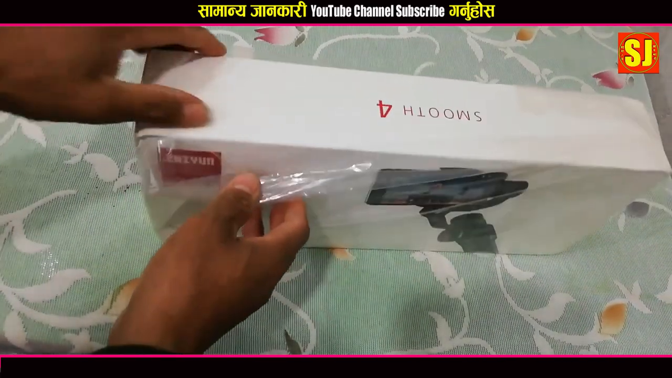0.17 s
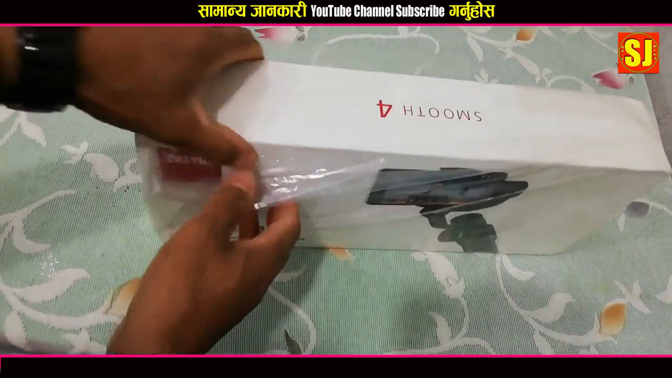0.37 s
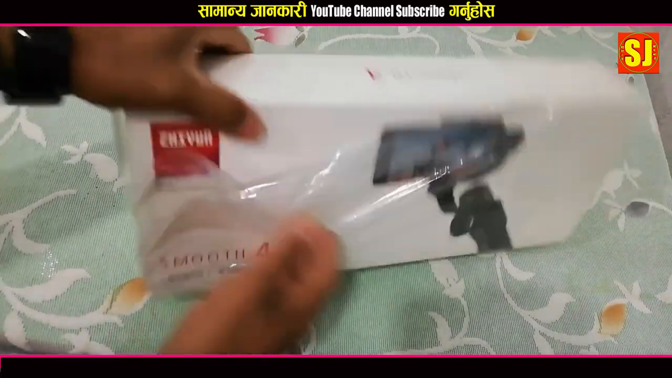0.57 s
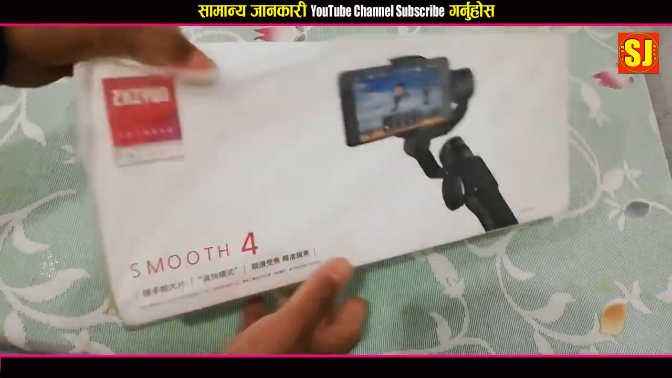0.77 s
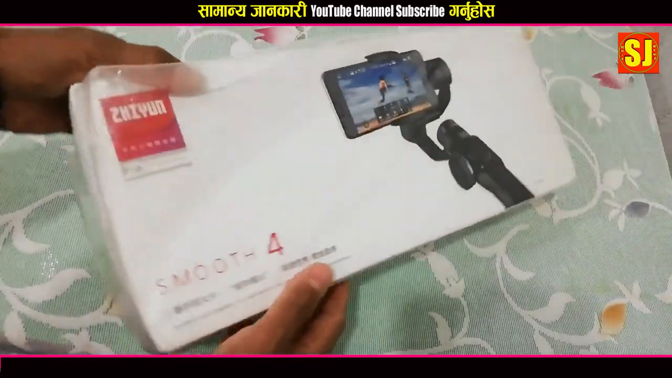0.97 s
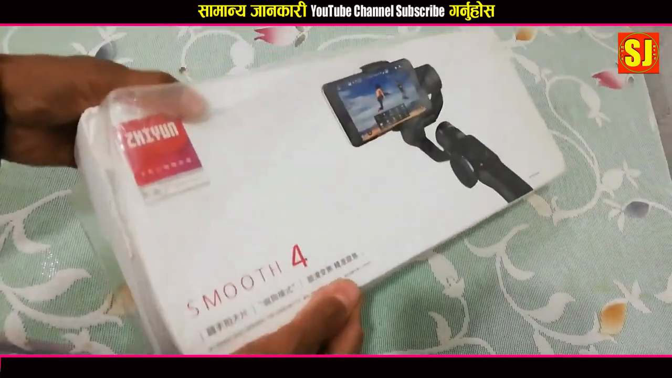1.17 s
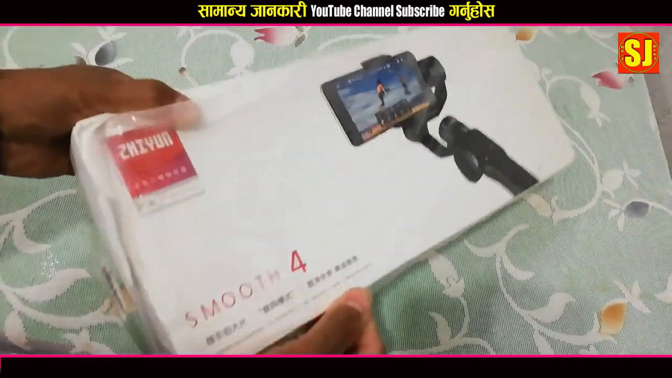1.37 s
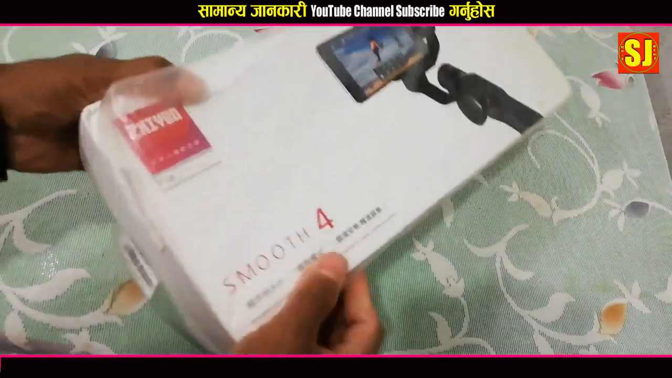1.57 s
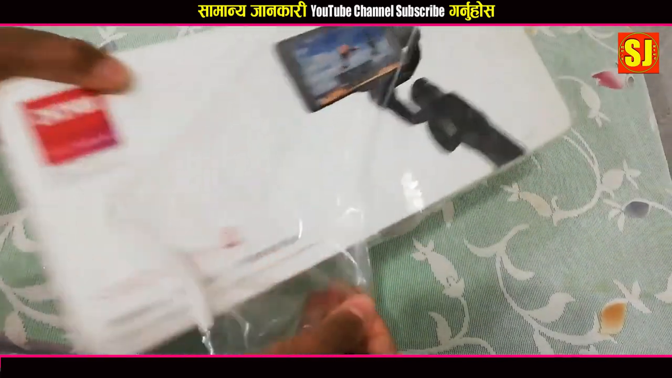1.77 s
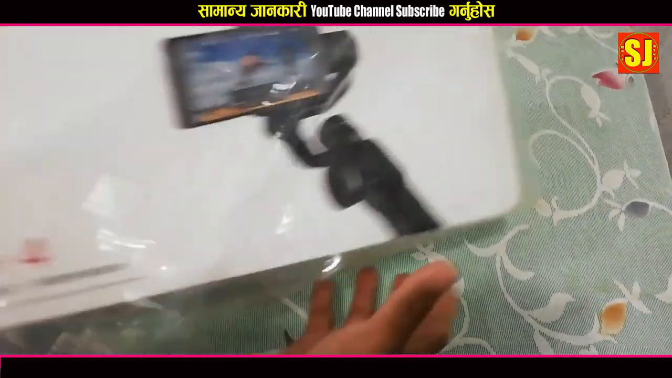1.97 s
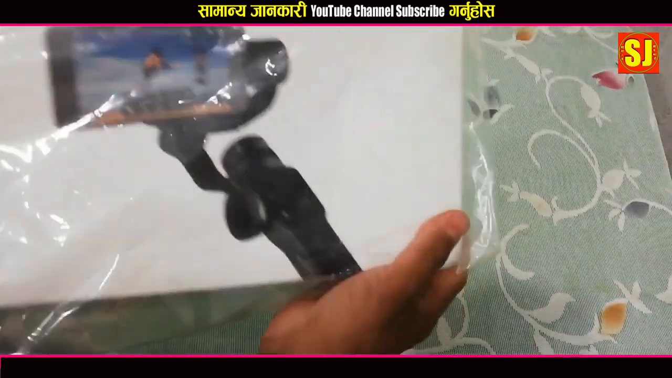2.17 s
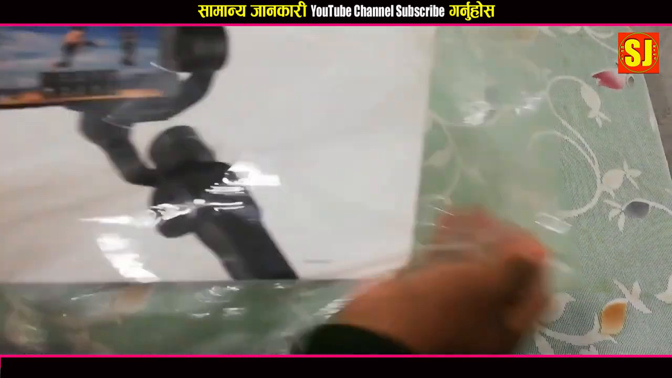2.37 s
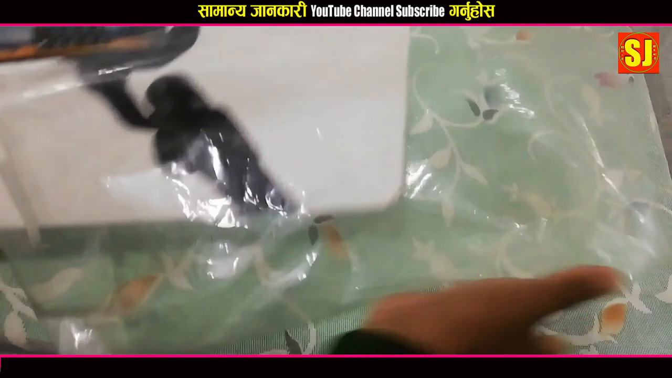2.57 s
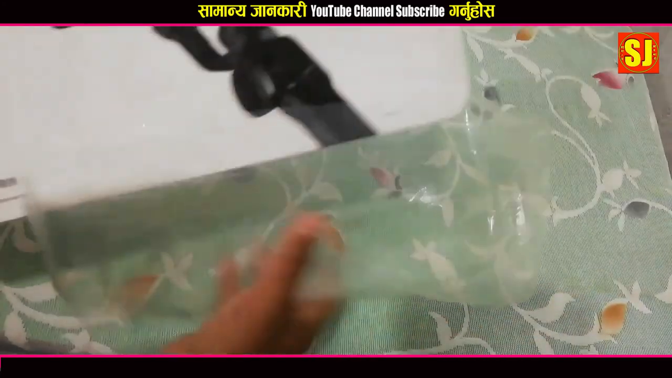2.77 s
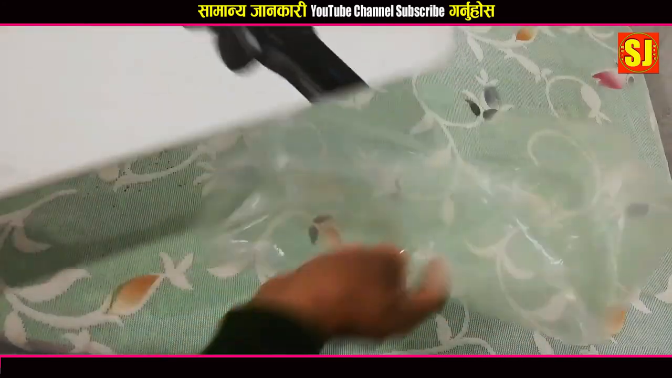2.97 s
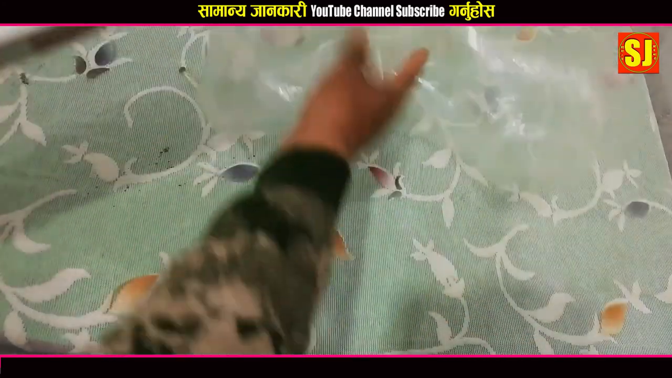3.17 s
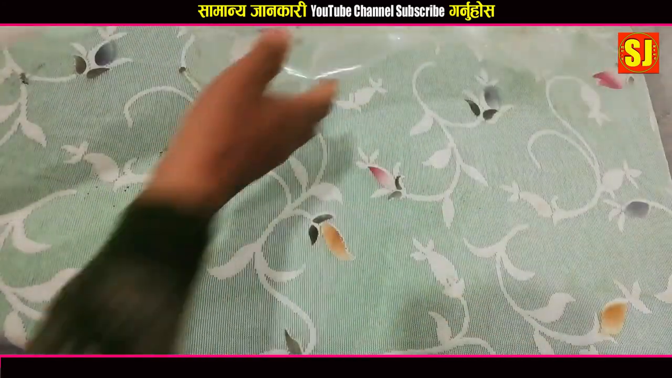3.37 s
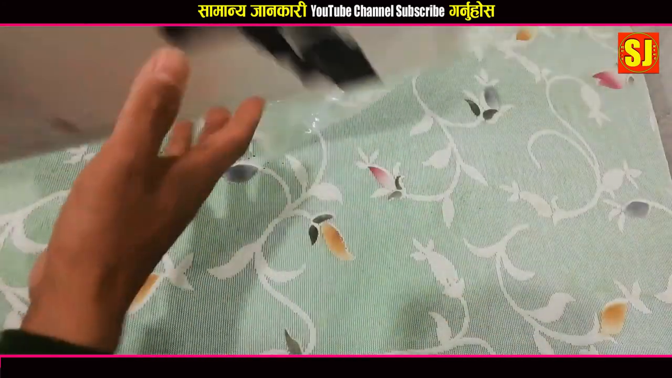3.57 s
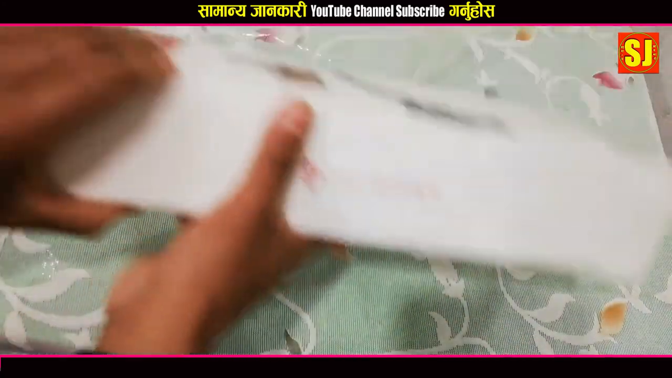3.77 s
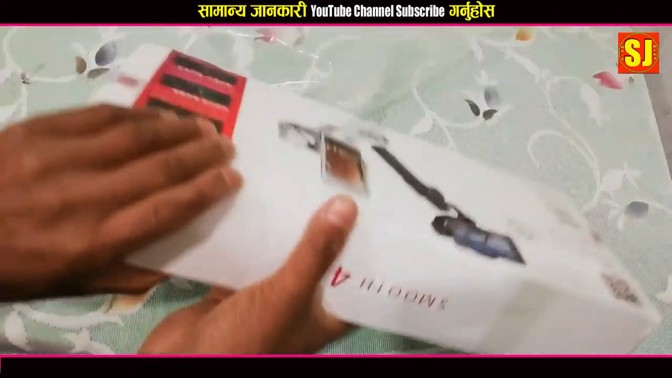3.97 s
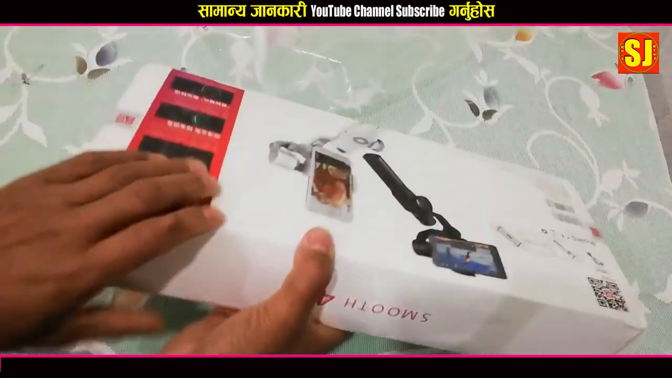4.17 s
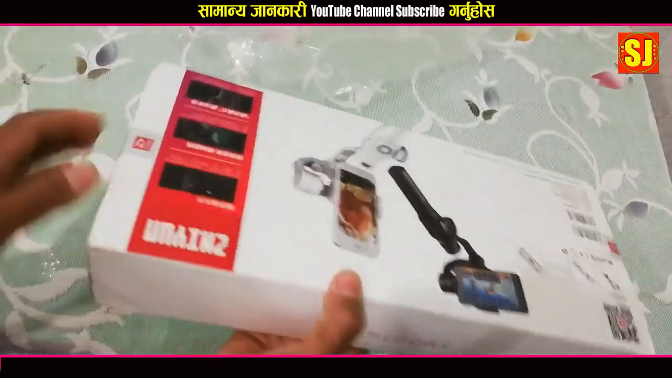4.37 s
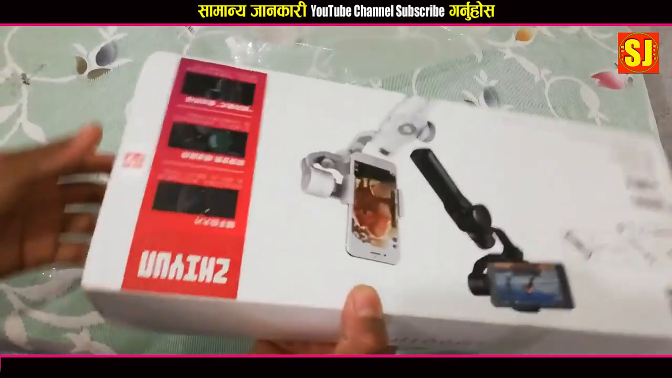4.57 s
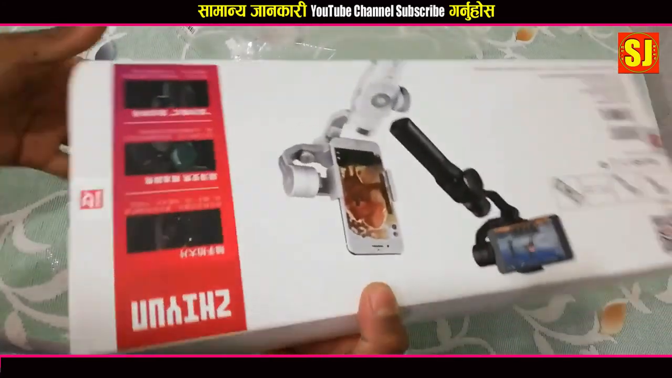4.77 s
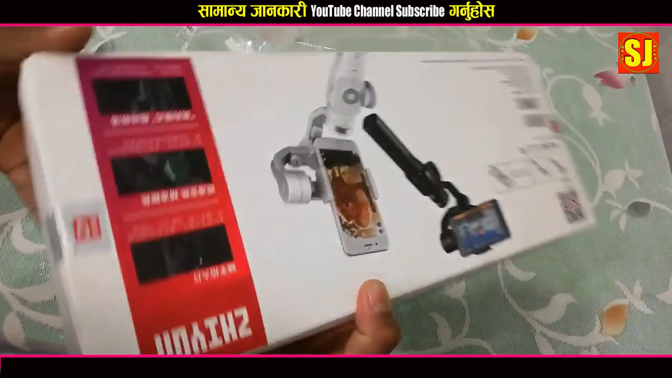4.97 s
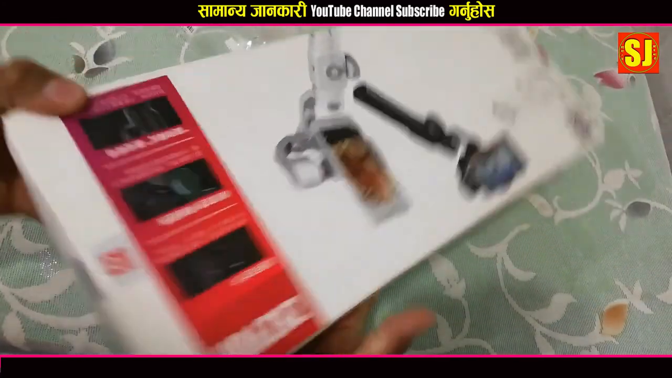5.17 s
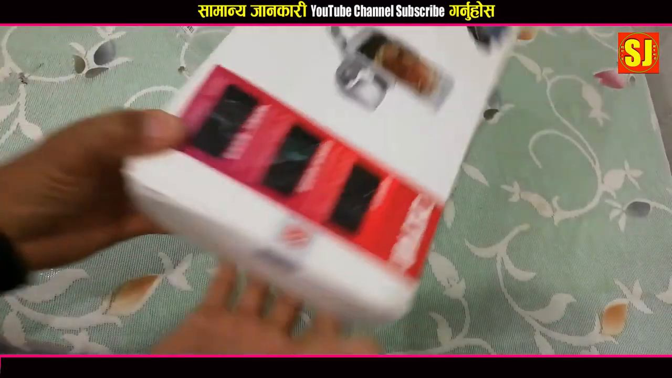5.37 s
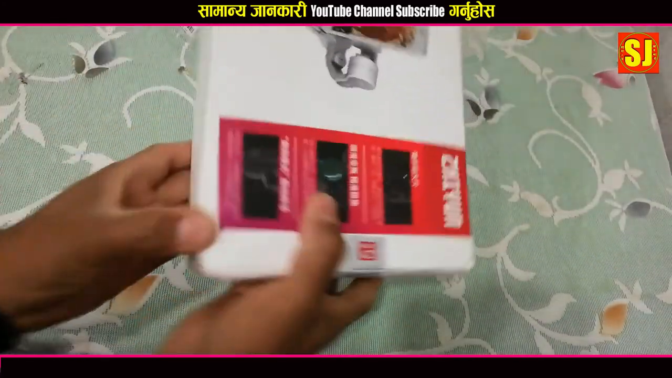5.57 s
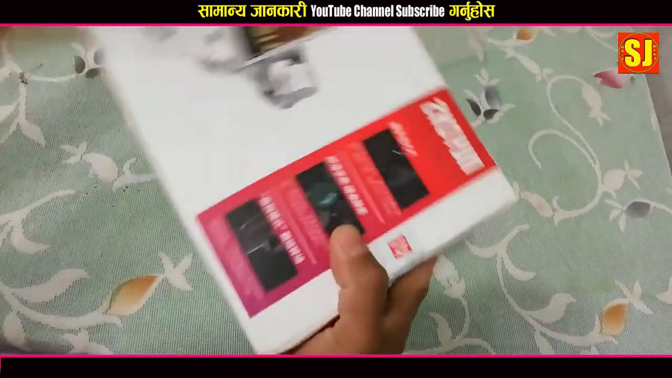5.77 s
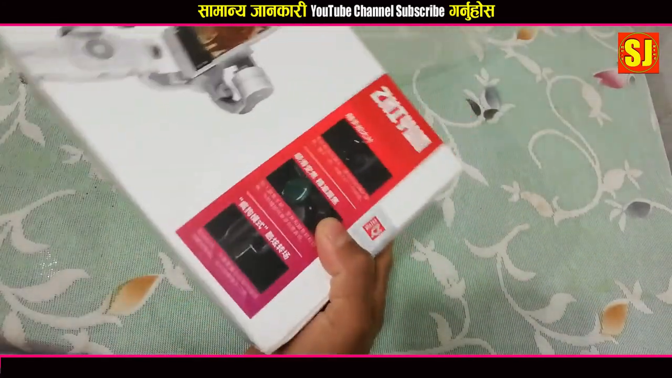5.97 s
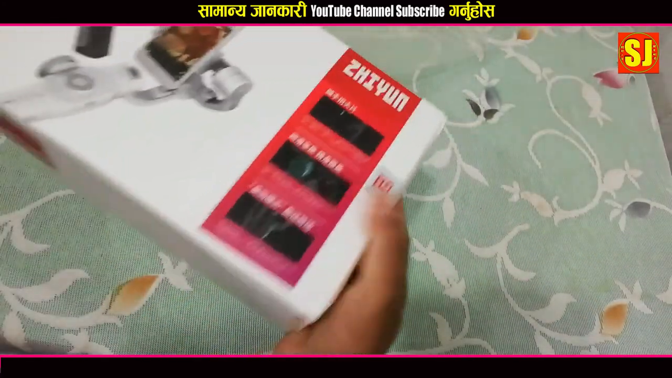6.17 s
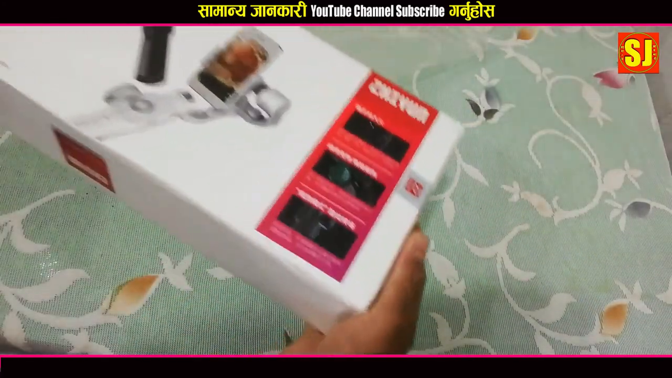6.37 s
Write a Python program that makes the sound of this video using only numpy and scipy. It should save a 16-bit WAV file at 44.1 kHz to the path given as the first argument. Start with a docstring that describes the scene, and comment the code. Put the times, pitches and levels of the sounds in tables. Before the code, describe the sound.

Close, bright crinkling of stiff plastic wrap builds to a dense tearing rustle, then thins into light swishes and hollow taps on a box.

```python
"""Hands tear clear shrink-wrap from a cardboard box, close to the microphone in a small room.
From the start film and palms slide over the card (swelling noise) and soft knocks thud (decaying sines).
Tugs buckle creases in swarms of clicks; taut ones snap (noise bursts), the loose sheet puffs (low noise),
and fingertips tap (filtered bursts). Later the bare box is turned over with more knocks and taps,
brief squeaks (wavering tones) and finger scuffs (rough noise through card resonances)."""
import sys
import numpy as np
from scipy import signal
from scipy.io import wavfile
from scipy.ndimage import uniform_filter1d

SR = 44100
rng = np.random.default_rng(int(sys.argv[2]) if len(sys.argv) > 2 else 0)


def wav_out(sig):
    """Save sig, one row per channel (or a flat mono array), as 16-bit PCM at SR to the path in sys.argv[1]."""
    wavfile.write(sys.argv[1], SR, np.round(np.clip(np.atleast_2d(sig).T, -1, 1) * 32767).astype(np.int16))


N = 283563
TIME = np.arange(N) / SR
ENVELOPE_STEP = 32  # samples
FILM_EDGES_HZ = np.linspace(np.sqrt(500), np.sqrt(16500), 15) ** 2
WIDE_EDGES_HZ = np.geomspace(22, 17000, 18)
CUTOFF_HZ = 16200

# Table levels are before the trims in the functions; left-right: + is left.
# Hand position: t/s, left-right/dB
HAND_PLACE = [(0, 1.5), (1.3, 1), (3.3, 2), (3.6, 1), (4.4, 2), (5.0, 5), (5.35, 1.5), (6.2, 4)]
# Tugs crumpling the film: t/s, rise/s, hold/s, level/dB, broad folds re level/dB, loose-sheet puff/dB
TUGS = [(0.043, 0.019, 0.031, -30, -9, -47.5), (0.142, .01, .08, -34, -12, -55),
        (0.387, 0.019, 0.094, -34, -9, -74), (0.553, 0.016, 0.036, -31, -13, -66),
        (0.585, 0.078, 0.042, -21, -13, -60), (1.128, 0.11, 0.11, -38, -15.5, -69),
        (1.303, 0.076, .025, -23.5, -13, -58), (1.417, .01, 0.086, -30, -13, -55),
        (1.49, .018, 0.017, -25, -13.5, -42.5), (1.574, 0.022, 0.045, -24.5, -16, -46.5),
        (1.683, .012, 0.11, -21, -20.5, -50), (1.75, .03, 0.079, -19, -22, -46.5),
        (1.862, 0.053, 0.021, -19, -12, -41), (1.94, 0.017, 0.058, -25.5, -13, -38),
        (2.031, .006, .055, -22.5, -11, -34.5), (2.184, 0.013, .025, -17.5, -15.5, -39.5),
        (2.237, 0.025, 0.035, -16.5, -17, -38.5), (2.355, 0.018, 0.065, -16.5, -13.5, -37.5),
        (2.457, 0.023, 0.042, -20.5, -15, -39), (2.548, 0.022, 0.059, -21, -10.5, -37.5),
        (2.66, 0.017, 0.013, -29, -3, -47), (2.723, 0.067, 0.036, -29.5, -19.5, -48.5),
        (2.812, .02, 0.06, -20, -9.5, -41.5), (2.887, .02, 0.11, -24.5, -6.5, -38),
        (3.038, 0.076, 0.099, -24, -5.5, -40), (3.251, 0.0062, 0.013, -32, -7, -43.5),
        (3.474, .012, 0.029, -36, -7.5, -55.5), (3.54, 0.011, 0.016, -24, -11, -45),
        (3.579, 0.022, 0.11, -36, -8, -43), (3.869, 0.0084, .1, -43.5, -9, -82),
        (4.089, 0.0066, 0.0196, -45.5, -7.5, -58), (4.173, 0.027, .01, -34, -10.5, -54),
        (4.324, 0.0043, .045, -38, -16, -75)]
# Palms and film sliding on card: t/s, rise/s, hold/s, level/dB, low treble re level/dB, midrange re level/dB
SLIDES = [(0, 0.0014, .04, -32, -1.5, -12.5), (0.237, 0.043, 0.14, -38, -3.5, -39),
          (0.904, 0.0078, .23, -43.5, -17.5, -19), (3.284, 0.063, 0.038, -30, -11, -20),
          (3.647, .04, .02, -31, -5, -25), (3.718, 0.029, 0.093, -34.5, -5, -13),
          (4.445, 0.008, .1, -59.5, -1, -26), (4.907, .015, .005, -52.5, -6.5, -18),
          (4.975, 0.059, 0.009, -31.5, -4.5, -22), (5.119, 0.16, 0.036, -27.5, -9, -30.5),
          (5.327, 0.0163, 0.015, -36, -4.5, -13), (5.481, .016, .01, -31, -6, -19),
          (5.513, 0.015, 0.086, -33, -4, -18), (5.635, 0.051, .01, -28.5, -3, -16),
          (5.842, 0.055, 0.0067, -27, -3.5, -7), (5.9, .02, 0.09, -33.5, -9, -28),
          (6.081, 0.045, .07, -30.5, -6, -24), (6.168, .06, 0.037, -27.5, -11.5, -20.5),
          (6.291, 0.018, .06, -35, -6, -12.5)]
# Single creases that stand out: t/s, level over 1 ms/dB, bright re dull part/dB, left-right/dB
SNAPS = [(0.0615, -14, 15.5, 2), (0.064, -9.5, 7, 1), (0.1491, -13, 6, 0.5), (0.231, -14.5, 1.5, 2.5),
         (0.426, -13, 2, 10), (0.485, -10, 9.5, 0.5), (0.4942, -17.5, 3, 2), (0.57, -20.5, 9, 6),
         (0.739, -16, 23, 4), (0.8374, -30.5, 0, 6), (1.1659, -22.5, 9, 10), (1.2537, -14, 12.5, 1),
         (1.3182, -17.5, 11, -4), (1.3211, -8.5, 18, 0), (1.3517, -10, 16, 6), (1.44, -14, 17, 7),
         (1.4846, -14.5, 0, 6), (1.513, -9.5, 0, -3), (1.5938, -14, 5.5, 1.5), (1.6939, -6, 18, 1.5),
         (1.7662, -15, 9.5, 1), (1.8826, -11.5, 14, 3), (1.9138, -10.5, 16, 2), (2.0337, -6.5, -0.5, 9),
         (2.1962, -10, 1, -2), (2.2447, -6, 12, -1.5), (2.282, -11, 10.5, -3), (2.295, -15.5, 1.5, -1.5),
         (2.35, -5.5, 8, 0), (2.548, -4, 6.5, 2), (2.6306, -10, 10, 2), (2.8344, -8, -2, 1),
         (2.866, -4, 2.5, 1), (3.1044, -20, 5, 14), (3.1647, -8, 2.5, -5), (3.1886, -11, 7, 4),
         (3.2007, -10, 13, 0), (3.2311, -9.5, 0.5, -1), (3.553, -17, 9, -6), (3.95, -29, 9, 9),
         (4.089, -24, 11, 5), (4.093, -22, 6.5, -2), (4.2077, -23.5, 20, -3), (4.3755, -16.5, 13, 1),
         (4.3784, -24, 2, 0), (5.3746, -23.5, 7.5, 5), (5.888, -20, 3, -1), (6.2175, -16, 17, 4)]
# Soft hand knocks: t/s, level/dB, panel f/Hz, box ring/dB, packing rattle/dB
KNOCKS = [(.007, -34, 187, -7, -9), (.052, -28.5, 136, 0, -11), (.075, -32, 356, -4, -6),
          (.708, -37.5, 119, 3, -9), (1.074, -27, 236, -7.5, -24), (2.823, -24, 110.1, -1, -14),
          (2.848, -21, 182, 2.5, -13.5), (2.919, -21.5, 99, -6, -12), (3.54, -32, 290, -2, -2.5),
          (4.082, -41, 182, 4, -12.5), (4.124, -33.5, 180, -6, -23), (4.175, -31, 272, -3.5, -11),
          (5.49, -31.5, 113, 0.5, -14), (5.702, -33.5, 200, -12, -5.5), (5.708, -30.5, 333, 4, -15),
          (5.866, -29, 249, 1.5, -10.5), (5.893, -33, 135, -9, -0.5), (6.068, -43.5, 213, -8, -16),
          (6.194, -28.5, 273, -3.5, -12)]
# Fingertips on card: t/s, level/dB, t60/s
TAPS = [(.23, -22.5, .024), (1.019, -40, 0.082), (4.178, -23.5, .03), (4.476, -44, 0.046),
        (4.534, -39, 0.08), (4.8286, -26.5, 0.013), (4.913, -43, 0.096), (5.496, -31, 0.071),
        (5.706, -23.5, .026), (6.195, -24, 0.021)]
# Film squeaking on card: t/s, level/dB, f/Hz, length/s
SQUEAKS = [(4.4947, -26, 9600, 0.006), (4.503, -35.5, 8400, 0.003)]
# Fingertips dragging over bare card: t/s, rise/s, hold/s, level/dB
SCUFFS = [(4.832, .005, .03, -61.5), (4.972, 0.0044, .01, -50.5), (5.002, 0.011, .045, -57.5),
          (5.33, 0.023, 0.01, -59), (5.585, 0.015, .005, -48)]
# Creasing film spectrum: f/Hz, density/(dB per Hz)
CREASE_SPECTRUM = [(290, -48), (500, -17.5), (729, -29), (1300, -14.5), (2360, -23.5), (3250, -7.5),
                   (4090, -13), (4940, 4), (7310, 0), (9770, 0.5), (10500, 1.5), (12500, -20),
                   (15100, -5.5), (16000, -64.5)]
# Sliding film spectrum: f/Hz, density/(dB per Hz)
RUB_SPECTRUM = [(290, -60), (500, -43), (893, -37.5), (1020, -34), (1300, -28), (2260, -22), (4150, -13),
                (4730, -5), (7210, -5.5), (9770, 10.5), (11300, 0), (16000, -20.5)]
# Film stereo balance: f/Hz, left-right/dB
FILM_BALANCE = [(1000, -1.5), (2500, -4), (5000, -3.5), (8500, 0.5), (13000, -2)]
# Snap colour, before the dull and bright parts are levelled: f/Hz, band gain/dB
SNAP_COLOUR = [(500, -53.5), (1200, -25), (2500, -20), (4000, -19), (5200, -3), (7500, -7), (9800, 19),
               (11500, -10.5), (13500, -8), (16000, -34)]
# Loose-sheet puff colour: f/Hz, band gain/dB
SHEET_SPECTRUM = [(18, -37), (30, -10.5), (97, -3), (150, 0), (183, -2), (225, 4.5), (377, -12.5),
                  (424, -3.5), (700, -17.5), (910, -43.5), (1540, -120)]
# Packing rattle colour: f/Hz, band gain/dB
RATTLE_SPECTRUM = [(40, -1.5), (90, -0.5), (200, 1.5), (380, -3), (600, -5.5), (1000, -15.5), (2500, -48.5)]
# Box ringing: f/Hz, level/dB, t60/s
BOX_MODES = [(119.6, -15.5, 0.35), (182, -12, 0.41), (279.4, -13, 0.16), (343.6, -20.5, .22),
             (381.3, -21.5, 0.55)]
# Card panel resonances: f/Hz, width/Hz, gain/dB
CARD_MODES = [(786, 100, 0), (1020, 59, -14.5), (1150, 52, -9), (1267, 32, -4.5), (1380, 43, -4),
              (1580, 110, -4)]
# Quiet room air colour: f/Hz, band gain/dB
ROOM_TONE = [(15, -51), (25, -17), (43, -10.5), (70, -10), (157, -20), (309, -20), (344, -30), (373, -27.5),
             (641, -32.5), (8140, -26), (16000, -46.5)]
# Room decay: f/Hz, t60/s
ROOM_T60 = [(100, 0.4), (400, 0.31), (1500, 0.34), (5000, 0.29), (10000, 0.23), (16000, 0.052)]
# Reflections re direct sound: f/Hz, level/dB
ROOM_LEVEL = [(60, -16), (200, -4), (1200, -4.5), (5000, -3.5), (10000, -7), (16000, -6)]
# Likeness of the channels in diffuse sound: f/Hz, likeness/(0-1)
LIKENESS = [(40, .97), (140, .97), (280, 0.8), (550, 0), (1100, .42), (2200, 0), (16000, 0)]

ROOM_TONE_DB = -64
TUG_RELEASE_DB_PER_S, SLIDE_RELEASE_DB_PER_S, SCUFF_RELEASE_DB_PER_S = 271.5, 297.5, 350
# low treble of a tug re its level; share of the broad folds' relative dB added to it
TUG_UPPER_DB, UPPER_FOLLOWS = 0.54, 0.36
# share of smooth friction, as against creasing (0-1)
TUG_FRICTION, SLIDE_FRICTION = .1, .8
# reference tug, its snap rate before friction thins it, mean snap level re tug
FIRM_TUG_DB, SNAPS_PER_S, SNAP_OVER_DB = -20, 38, 8.5
HOLLOW_LOW_HZ, HOLLOW_HIGH_HZ = 887, 1450  # hollow range of the card under a fingertip


def from_db(db):
    """Decibels to gain."""
    return 10 ** (np.asarray(db) / 20)


def rms_one(x):
    """Scale to rms 1."""
    return x / np.sqrt(np.mean(x ** 2) + 1e-20)


def at_hz(points, hz):
    """Read a table on a log-frequency axis."""
    f, value = np.transpose(points)
    return np.interp(np.log(hz), np.log(f), value)


def band(x, low_hz, high_hz):
    """Causal band-pass."""
    sos = signal.butter(2, [low_hz, high_hz], "band", fs=SR, output="sos")
    return signal.sosfilt(sos, x + 1e-18)


def drift(points_per_s):
    """Slow interpolated chance, rms 1."""
    steps = rng.standard_normal(4000)
    return rms_one(np.interp(TIME * points_per_s, np.arange(len(steps)), steps))


def add(out, s, sound):
    """Mix a sound in from time s."""
    start = max(round(s * SR), 0)
    out[:, start:start + sound.shape[-1]] += sound[..., :N - start]


def diffuse_bands(size):
    """Yield (Hz, stereo noise) per band: alike in the bass, unrelated in the top treble."""
    white = rng.standard_normal((2, 2, size))
    for k, (low, high) in enumerate(zip(WIDE_EDGES_HZ, WIDE_EDGES_HZ[1:])):
        hz = np.sqrt(low * high)
        alike = np.clip(at_hz(LIKENESS, hz), 0, 1)
        mid, side = band(white[k % 2], low, high)  # adjacent bands use separate noise
        yield hz, np.sqrt((1 + alike) / 2) * mid + np.sqrt((1 - alike) / 2) * side * [[1], [-1]]


def coloured_noise(spectrum, size):
    """Stereo noise with tabulated band gains, rms 1."""
    return rms_one(sum(from_db(at_hz(spectrum, hz)) * noise for hz, noise in diffuse_bands(size)))


def swells(rows, release_db_per_s):
    """Power envelope of each hand movement: it rises, holds and dies away."""
    s, rise, hold = np.transpose(rows)[:3, :, None]
    since = TIME[::ENVELOPE_STEP] - s
    fall_db = np.clip(release_db_per_s * (since - rise - hold), 0, 200)
    return (np.clip(since / rise, 0, 1) * from_db(-fall_db)) ** 2


def summed_db(envelopes, db):
    """Power-summed level of all movements at every sample."""
    power = from_db(db) ** 2 @ envelopes
    return np.interp(TIME, TIME[::ENVELOPE_STEP], 10 * np.log10(power + 1e-12))


def handling():
    """Tugs and slides set treble, low treble, midrange and puff levels, and the friction share."""
    tugs = swells(TUGS, TUG_RELEASE_DB_PER_S)
    slides = swells(SLIDES, SLIDE_RELEASE_DB_PER_S)
    tug_db, folds_db, puff_db = np.transpose(TUGS)[3:]
    slide_db, slide_upper_db, slide_mid_db = np.transpose(SLIDES)[3:]
    both = np.vstack([tugs, slides])
    tug_upper_db = tug_db + TUG_UPPER_DB + UPPER_FOLLOWS * folds_db
    top_db = summed_db(both, np.r_[tug_db, slide_db])
    upper_db = summed_db(both, np.r_[tug_upper_db, slide_db + slide_upper_db])
    body_db = summed_db(both, np.r_[tug_db + folds_db, slide_db + slide_mid_db])
    slide_share = from_db(summed_db(slides, slide_db) - top_db) ** 2
    sliding = np.clip(TUG_FRICTION + (SLIDE_FRICTION - TUG_FRICTION) * slide_share, 0, 1)
    return top_db, upper_db, body_db, sliding, summed_db(tugs, puff_db)


def creases(per_s, spread_db, clump_db, even_s):
    """Moments and sizes of buckling creases: many small, few large, in avalanches."""
    at = np.flatnonzero(rng.random(N) < per_s / SR)
    spread = spread_db * np.minimum(rng.exponential(1, N), 4.5)
    sizes = from_db(spread + clump_db * drift(170))[at]
    power = np.zeros(N)
    power[at] = sizes ** 2
    # the pull of the hands limits the energy released: even it out locally
    local_power = np.maximum(uniform_filter1d(power, int(even_s * SR)), 1e-9)[at]
    return at, sizes / np.sqrt(local_power)


def band_shares(spectrum, zone):
    """Gain of each film band, with the power of every zone summing to 1."""
    centre_hz = np.sqrt(FILM_EDGES_HZ[1:] * FILM_EDGES_HZ[:-1])
    power = from_db(at_hz(spectrum, centre_hz)) ** 2 * np.diff(FILM_EDGES_HZ)
    return np.sqrt(power / np.bincount(zone, power)[zone])


def film(top_db, upper_db, body_db, sliding, colour_db=4.5, pan_db=3.0, lag_s=.00022, shift_db=2.5,
         top_trim_db=-1.22, upper_trim_db=-4.5, body_trim_db=-6.5, fold_db=-6.0):
    """Every crease clicks with its own colour and place; sliding adds a fine, grainy hiss."""
    rate = 2300 * from_db(0.36 * (top_db + 23.5))
    at, sizes = creases(per_s=rate, spread_db=1.0, clump_db=3.5, even_s=0.054)
    place = rng.standard_normal(N)[at]
    late = np.clip(at + np.round(place * lag_s * SR).astype(int), 0, N - 1)
    arrivals = [at, late]
    zone = np.digitize(FILM_EDGES_HZ[:-1], [2000, 6800])  # midrange, low treble, treble
    # broad folds speak low, sharp creases high
    gains = [from_db(body_db + body_trim_db), from_db(upper_db + upper_trim_db), from_db(top_db + top_trim_db)]
    crease_share, rub_share = band_shares(CREASE_SPECTRUM, zone), band_shares(RUB_SPECTRUM, zone)
    friction = np.sqrt(sliding) * rms_one(from_db(2.0 * drift(260)))
    creasing = np.sqrt(1 - sliding)
    out = np.zeros((2, N))
    for k, (low, high) in enumerate(zip(FILM_EDGES_HZ, FILM_EDGES_HZ[1:])):
        hiss = rng.standard_normal((2, N))
        colour, sign, pan = rng.standard_normal((3, N))[:, at]
        strength = sizes * np.sign(sign) * from_db(colour_db * np.clip(colour, -2, 1.5))
        clicks = np.zeros((2, N))
        for ear in (0, 1):
            clicks[ear, arrivals[ear]] = strength * from_db((-1) ** ear * pan_db * (place + pan) / 2)
        clicks = rms_one(clicks)
        drive = crease_share[k] * creasing * clicks + rub_share[k] * friction * hiss
        drive = drive * gains[zone[k]]
        if 2000 < low < 4000:
            # broad folds also crackle up into the low treble
            drive = drive + clicks * gains[0] * from_db(fold_db)
        # the film's resonances shift as it changes shape
        shape = from_db(shift_db * (2000 / high) ** 0.14 * drift(22))
        lean_db = at_hz(FILM_BALANCE, np.sqrt(low * high))
        width_gain = np.sqrt(SR / 2 / (high - low))
        out += band(drive, low, high) * width_gain * shape * from_db([[lean_db / 2], [-lean_db / 2]])
    return out


def catching(sliding, depth_db=1.34, points_per_s=45):
    """Crumpling film catches and gives way in small jerks; sliding film runs more evenly."""
    return from_db(depth_db * (1 - sliding) * drift(points_per_s))


def knocks(level_db=0.0, thud_t60_s=0.059, contact_s=0.0036, rattle_t60_s=0.2, rattle_cut_ratio=0.41):
    """A soft hand bends one panel in a damped thud; the box rings on and its packing shakes."""
    out = np.zeros((2, N))
    t = np.arange(SR // 3) / SR
    rattles = coloured_noise(RATTLE_SPECTRUM, size=len(t) * len(KNOCKS)).reshape(2, len(KNOCKS), -1)
    chances = rng.standard_normal((len(KNOCKS), len(BOX_MODES)))
    for k, (s, db, hz, ring_db, rattle_db) in enumerate(KNOCKS):
        knock = np.sin(2 * np.pi * hz * t) * from_db(-60 * t / thud_t60_s)
        for (mode_hz, mode_db, t60_s), luck in zip(BOX_MODES, chances[k]):
            apart_db = 6 * abs(np.log2(mode_hz / hz))  # modes near the panel's pitch take most energy
            grip = 1 + 0.015 * luck  # each grip retunes the panels a little
            decay = from_db(ring_db + mode_db - apart_db - 60 * t / t60_s)
            knock += np.sin(2 * np.pi * mode_hz * grip * t) * decay
        # a high-pitched panel shakes little bass out of the packing
        high_pass = signal.butter(2, rattle_cut_ratio * hz, "high", fs=SR, output="sos")
        shake = signal.sosfilt(high_pass, rattles[:, k])
        knock = knock + shake * from_db(rattle_db - 60 * t / rattle_t60_s)
        add(out, s, from_db(db + level_db) * knock * (1 - np.exp(-t / contact_s)))
    return out


def flapping(puff_db, level_db=-3.5, lumps_db=3.0):
    """The loose sheet pushes air in uneven low puffs."""
    puffs = rms_one(coloured_noise(SHEET_SPECTRUM, size=N) * from_db(lumps_db * drift(70)))
    return from_db(puff_db + level_db) * puffs


def chance_snaps(top_db, sliding, follows=0.67, spread_db=1.5, bright_db=11.5, left_db=-1.5, pan_db=3.5):
    """The harder the tug, the more often a taut crease lets go; rows as in SNAPS."""
    tautness = np.clip(1 - sliding / SLIDE_FRICTION, 0, 1)
    rate = SNAPS_PER_S * tautness * from_db(follows * (top_db - FIRM_TUG_DB))
    at = np.flatnonzero(rng.random(N) < rate / SR)
    size, place = rng.standard_normal((2, len(at)))
    level_db = np.minimum(top_db[at], FIRM_TUG_DB) + SNAP_OVER_DB + spread_db * size
    return np.column_stack([at / SR, level_db, np.full(len(at), bright_db), left_db + pan_db * place])


def unit_burst(x):
    """Scale to the energy of 1 ms at rms 1."""
    return x / np.sqrt(np.sum(x ** 2, axis=-1, keepdims=True) / (SR / 1000))


def snaps(rows, level_db=0.16, ring_s=0.00037, flutter_db=-21, flutter_s=0.0034, lag_s=.00012, size=1024):
    """A taut crease flips in under a millisecond and the film around it shivers briefly."""
    out = np.zeros((2, N))
    t = np.arange(size) / SR
    shape = np.exp(-t / ring_s) + from_db(flutter_db) * np.exp(-t / flutter_s)
    draws = rng.standard_normal((len(rows), 3, size))
    kicks = (draws[:, :2] + draws[:, 2:]) * shape  # third draw is common to both ears
    parts = []
    for k, (low, high) in enumerate(zip(FILM_EDGES_HZ, FILM_EDGES_HZ[1:])):
        gain = (-1) ** k * from_db(at_hz(SNAP_COLOUR, np.sqrt(low * high)))
        parts.append(gain * band(kicks, low, high))
    dull, bright = sum(parts[:8]), sum(parts[8:])  # split near 6.9 kHz
    bursts = unit_burst(unit_burst(dull) + from_db(rows[:, 2, None, None]) * unit_burst(bright))
    lags_s = lag_s * draws[:, 2, -1]
    for (s, db, _, pan_db), burst, lag in zip(rows, bursts, lags_s):
        for ear, side in enumerate((1, -1)):
            gain = from_db(db + level_db + side * pan_db / 2)
            add(out[ear:ear + 1], s + side * lag / 2, gain * burst[ear])
    return out


def taps(level_db=0.0, click_db=-13.0, size=8192):
    """A fingertip's short burst is coloured by the hollow card; a little bare click gets through."""
    bursts = np.zeros((2, N))
    t = np.arange(size) / SR
    for (s, db, t60_s), noise in zip(TAPS, rng.standard_normal((len(TAPS), 3, size))):
        add(bursts, s, from_db(db + level_db - 60 * t / t60_s) * (noise[2] + noise[:2] / 2))
    return band(bursts, HOLLOW_LOW_HZ, HOLLOW_HIGH_HZ) + from_db(click_db) * band(bursts, 280, 2200)


def card(x):
    """Film and fingers that touch the box set its stiff panels ringing: parallel resonators, mono."""
    mono = x.sum(axis=0) + 1e-18
    out = 0
    for hz, width_hz, db in CARD_MODES:
        r = np.exp(-np.pi * width_hz / SR)
        zeros = [(1 - r * r) / 2, 0, -(1 - r * r) / 2]
        poles = [1, -2 * r * np.cos(2 * np.pi * hz / SR), r * r]
        out = out + from_db(db) * signal.lfilter(zeros, poles, mono)
    return out


def squeaks(pan_db=8.5):
    """Film sticks and slips for a few milliseconds on one high, wavering note."""
    out = np.zeros((2, N))
    for s, db, hz, length_s in SQUEAKS:
        size = int(length_s * SR)
        phase = 2 * np.pi * np.cumsum(hz * (1 + 0.048 * rng.standard_normal(size))) / SR
        add(out, s, from_db([[db + pan_db], [db - pan_db]]) * np.hanning(size) * np.sin(phase))
    return out


def scuffs(level_db=-2.5, rough_db=1.5):
    """Skin sticks and slips on the card and keeps its panels ringing."""
    slips = rng.standard_normal((1, N)) * from_db(rough_db * drift(330))
    drag_db = summed_db(swells(SCUFFS, SCUFF_RELEASE_DB_PER_S), np.transpose(SCUFFS)[3])
    return from_db(drag_db + level_db) * rms_one(card(band(slips, HOLLOW_LOW_HZ, HOLLOW_HIGH_HZ)))


def room_response(build_s=0.00089):
    """Reflections from the bed and near walls build up fast and die sooner in the top treble."""
    t = np.arange(int(.6 * SR)) / SR
    response = 0
    for hz, noise in diffuse_bands(size=len(t)):
        decay = from_db(-60 * t / at_hz(ROOM_T60, hz)) * (1 - np.exp(-t / build_s))
        response = response + from_db(at_hz(ROOM_LEVEL, hz)) * noise * decay / np.sqrt(np.sum(decay ** 2))
    return response


def room(x, count=5, patterns_per_s=11):
    """The sound wanders over the sheet, so it crossfades from one pattern of reflections to the next."""
    spot = patterns_per_s * TIME + drift(9)
    out = 0
    for k in range(count):
        away = abs((spot - k + count / 2) % count - count / 2)
        share = np.cos(np.pi / 2 * np.minimum(away, 1))
        out = out + signal.fftconvolve(x * share, room_response(), axes=1)[:, :N]
    return out


def room_air():
    """Steady quiet noise of the room."""
    return from_db(ROOM_TONE_DB) * coloured_noise(ROOM_TONE, size=N)


def scene(card_db=-8.5, squeak_room_db=-2.5):
    """Film and box in the room, over its quiet air."""
    pan_db = np.interp(TIME, *np.transpose(HAND_PLACE))
    top_db, upper_db, body_db, sliding, puff_db = handling()
    rustle = film(top_db, upper_db, body_db, sliding)
    rustle = rustle * from_db([pan_db / 2, -pan_db / 2]) * catching(sliding)
    all_snaps = np.vstack([SNAPS, chance_snaps(top_db, sliding)])
    touch = rustle + snaps(all_snaps) + taps()
    direct = touch + from_db(card_db) * card(touch) + scuffs() + flapping(puff_db) + knocks()
    squeak = squeaks()
    reflected = room(direct + from_db(squeak_room_db) * squeak)
    return direct + squeak + reflected + room_air()


def record(dry):
    """Round the highest peaks and low-pass the top."""
    rounded = .95 * np.tanh(dry / .95)
    return signal.sosfilt(signal.ellip(12, .2, 70, CUTOFF_HZ, fs=SR, output="sos"), rounded)


dry = scene()
out = record(dry)
wav_out(out)
```